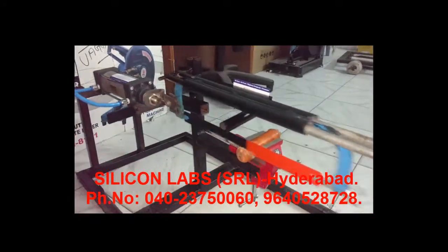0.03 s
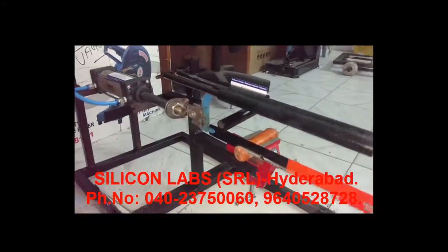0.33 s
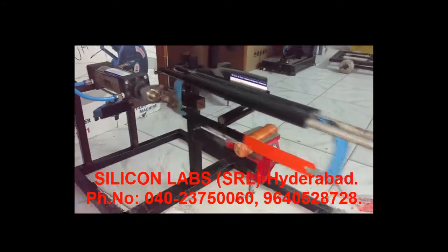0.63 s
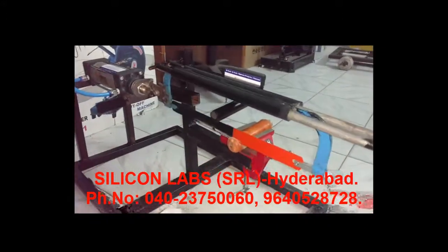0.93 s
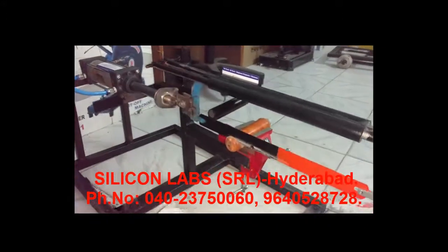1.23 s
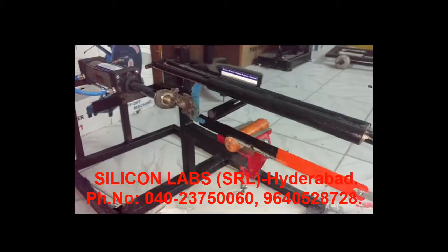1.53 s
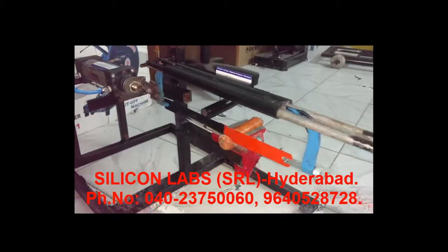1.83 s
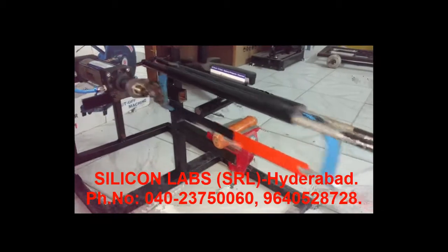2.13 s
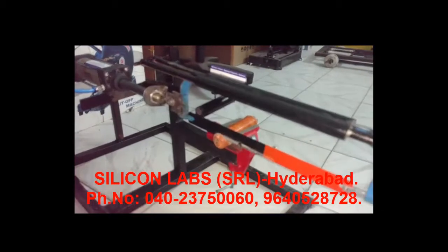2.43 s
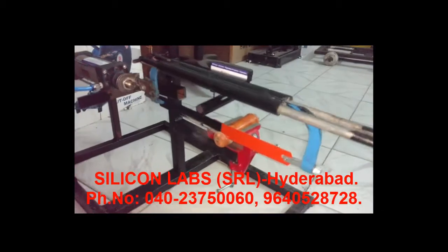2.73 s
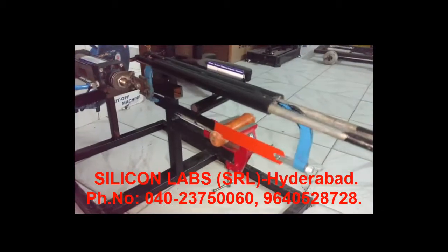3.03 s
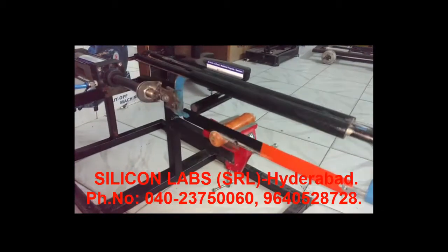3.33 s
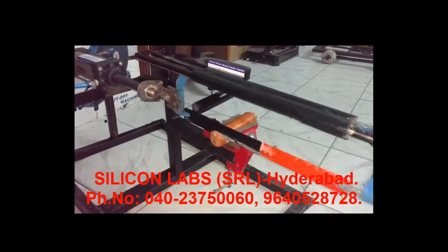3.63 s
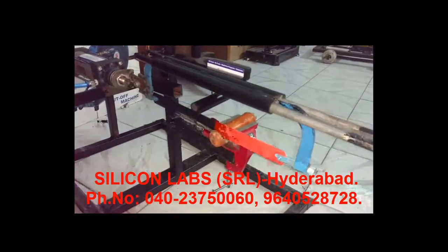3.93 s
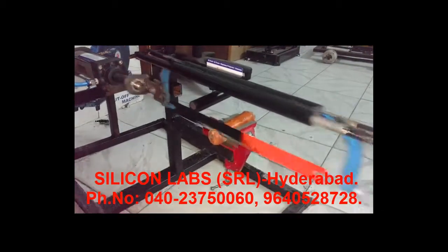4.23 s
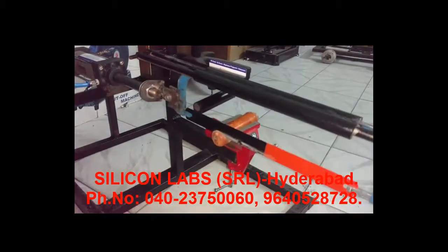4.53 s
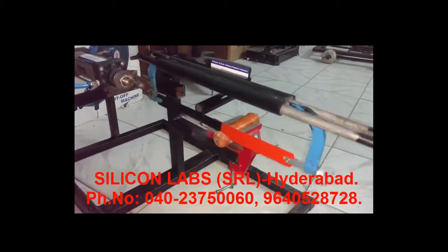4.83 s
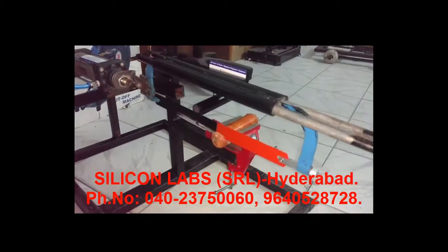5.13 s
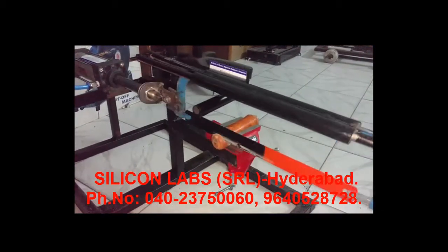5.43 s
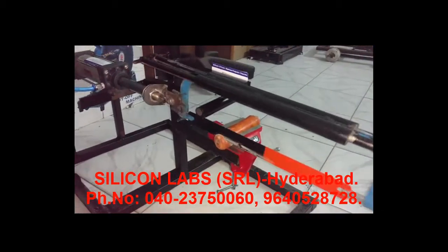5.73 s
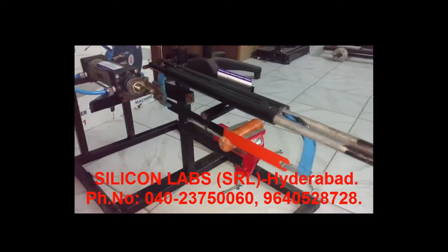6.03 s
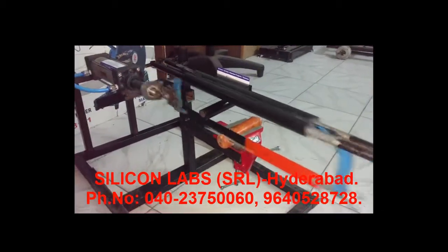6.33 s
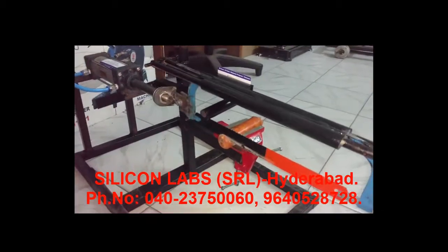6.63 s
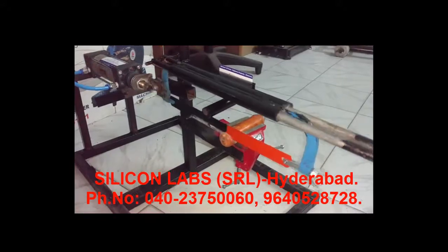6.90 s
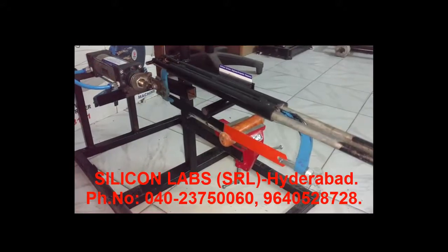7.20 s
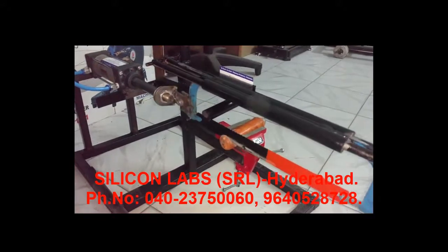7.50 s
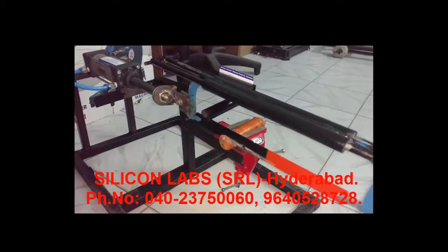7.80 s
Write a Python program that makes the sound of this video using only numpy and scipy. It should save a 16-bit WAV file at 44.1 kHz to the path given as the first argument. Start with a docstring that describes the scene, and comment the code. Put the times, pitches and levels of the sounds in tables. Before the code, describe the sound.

Sharp bursts of exhaust air and short metallic rattles alternate steadily as a pneumatic machine cycles in an echoing workshop.

```python
"""A sharp hiss of air, then a steel clatter: an air cylinder drives a slide out and back once a second.
At each reversal the valve thumps and dumps a chamber of air through its exhaust port. Just under a fifth
of a second later the slide rattles into its stop and rings the tube frame. On the way back the rod ticks
and the slide sometimes squeaks. The tiled workshop echoes and murmurs, and a seal leaks a little air
while the slide is out."""
import sys
import numpy as np
from scipy import signal
from scipy.fft import rfft, irfft, next_fast_len
from scipy.io import wavfile
from scipy.ndimage import map_coordinates

SR = 44100
rng = np.random.default_rng(int(sys.argv[2]) if len(sys.argv) > 2 else 0)


def inscribe(sig):
    """Save sig as 16-bit PCM at rate SR to the path in sys.argv[1].

    A 1-D sig is mono; a 2-D sig holds one channel per row.
    Samples are clipped to [-1, 1] before scaling.
    """
    pcm = np.round(np.clip(np.atleast_2d(sig).T, -1, 1) * 32767)
    wavfile.write(sys.argv[1], SR, pcm.astype(np.int16))


N = 355446
TIME = np.arange(N) / SR

# Strokes of the slide: (valve opens [s], hiss level [dB], treble offset [dB], knock level [dB],
# first rebound level [dB], time for the rattle to fade by 60 dB [s])
OUT_STROKES = [(0.0283, -8, -11, -21.5, -31, 0.27), (1.0664, -6.5, -12.5, -13.5, -27, 0.14),
               (2.1057, -7, -12, -18.5, -24.5, 0.3), (3.1423, -9, -10, -26, -25, 0.21),
               (4.1788, -9, -10, -22.5, -18, 0.14), (5.217, -10, -11, -19, -19.5, 0.13),
               (6.2555, -8, -13, -19, -21, .18), (7.2924, -7, -13, -22.5, -17, 0.31)]
BACK_STROKES = [(0.5249, -10, -12, -23, -35, 0.14), (1.5635, -10.5, -12.5, -25, -49, 0.15),
                (2.5987, -10, -13, -28, -28, 0.12), (3.6374, -11, -14.5, -33, -37.5, 0.25),
                (4.6748, -11, -12, -21.5, -28.5, 0.23), (5.7117, -12, -13, -24.5, -28.5, 0.22),
                (6.752, -10.5, -14.5, -22.5, -25, 0.19), (7.7865, -10.5, -14, -26, -28.5, 0.25)]
# Squeaks of the returning slide: (time [s], level [dB], pitch [Hz])
SQUEAKS = [(.735, -35, 6100), (.86, -37.5, 5900), (4.895, -28, 6500), (4.995, -38.5, 5930),
           (5.932, -28, 6630), (6.977, -24.5, 6450)]

# Tone colour of each noise: (frequency [Hz], level [dB])
WORKSHOP_SPECTRUM = [(25, -12), (70, -10.5), (160, 4), (400, 2), (650, 2), (900, -4), (2000, -12),
                     (3500, -4), (6400, -3), (8000, -6), (16000, -9.5)]
LEAK_SPECTRUM = [(1000, -27), (3000, -5), (6500, 6), (10000, -1), (14500, 4), (16000, -3.5)]
CLATTER_SPECTRUM = [(100, -26), (400, -4), (550, -14.5), (720, -3), (900, -6.5), (1250, -2.5), (1500, 0),
                    (1700, 0.5), (2200, -1.5), (3200, -3), (4500, -8.5), (10000, -36)]  # loose steel parts
CONTACT_SPECTRUM = [(800, -10.5), (2500, 2), (4500, 3), (7000, 1), (10000, -3), (16000, -49)]  # steel touching steel
PUFF_SPECTRUM = [(25, -8), (70, -6), (150, 5), (260, -22), (450, 5.5), (800, -2), (1600, -26),
                 (4000, -22.5)]  # the first air out of the valve
JET_SPECTRUM = [(30, -17.5), (150, -16), (600, -12), (1050, -12.5), (2000, -8.5), (2800, -5.5),
                (3400, -3.5), (4300, -2.5), (5200, 1), (6000, -1), (7000, 0), (8500, -4), (11000, -9.5),
                (16000, -19)]  # the main hiss
FIZZ_SPECTRUM = [(4000, -20), (8000, -5), (11500, -1), (13500, -2.5), (16000, -8)]  # the treble on top of the hiss

# Resonances of the tube frame and the two exhaust ports: (frequency [Hz], width [Hz], level [dB])
FRAME_MODES = [(649, 21.5, -1), (674, 6.5, 6), (730.6, 11.4, 5), (1118, 26, -0.5), (1219, 24, -0.5),
               (1321, 15, -0.5), (1395, 26, -3), (1429, 16, 4.5), (1511, 21.5, 1.5), (1867, 10.6, 9.5),
               (1996, 55, 6.5), (2280, 160, -21), (2575, 33, 9), (2990, 20, 0.5), (3165, 91, -3.5),
               (3375, 17, 4.5)]
OUT_PORT_MODES = [(3400, 440, -10), (3625, 180, -2), (6275, 270, 2), (6630, 240, -3), (11500, 490, -18),
                  (13900, 400, -18)]
BACK_PORT_MODES = [(3490, 99, -3), (4200, 260, -9), (5440, 170, -6), (6060, 380, 3), (6340, 300, 0),
                   (8800, 330, -32)]

# Echo of the workshop: (frequency [Hz], time to fade by 60 dB [s])
ROOM_DECAY = [(150, 0.51), (1000, 0.68), (4000, 0.55), (8000, 0.41), (15000, 0.34)]
# How alike left and right can be: (frequency [Hz], likeness [1 = fully, 0 or less = unrelated])
STEREO_LIKENESS = [(80, 0.15), (350, 0.25), (1200, 0.46), (2300, .5), (3400, 0.83), (4700, 0.5),
                   (6300, 0.62), (8000, 0.23), (16000, -0.74)]
# Which side is louder: (frequency [Hz], left minus right [dB])
STEREO_BALANCE = [(80, -2.5), (350, 1.5), (1000, -1), (3500, -1), (4500, -2.5), (6700, -4.5), (9300, -2),
                  (16000, -3.5)]


def amp(db):
    """Turn decibels into a gain."""
    return 10 ** (np.asarray(db) / 20)


def unit_rms(x):
    """Scale a signal to an average power of 1."""
    return x / np.sqrt(np.mean(x ** 2) + 1e-20)


def curve_at(points, hz):
    """Read between (frequency, value) points on a log frequency axis."""
    freqs, values = np.transpose(points)
    return np.interp(np.log(hz + 1), np.log(freqs + 1), values)


def filtered(x, response):
    """Give each frequency in x the gain and phase that response(hz) asks for."""
    size = next_fast_len(N + SR // 2)
    return irfft(rfft(x, size) * response(np.fft.rfftfreq(size, 1 / SR)), size)[..., :N]


def noise(spectrum):
    """Two unrelated noises with the same tone colour."""
    size = next_fast_len(N)
    gain = amp(curve_at(spectrum, np.fft.rfftfreq(size, 1 / SR)))
    white = rng.standard_normal((2, size))
    return unit_rms(irfft(rfft(white) * gain, size)[:, :N])


def wobble(rate):
    """A smooth curve through `rate` random values a second."""
    return map_coordinates(rng.standard_normal(int(N * rate / SR) + 4), [TIME * rate / SR])


def add(track, start_s, sound):
    """Mix a sound into a track at the given time."""
    part = track[..., max(0, round(start_s * SR)):][..., :sound.shape[-1]]
    part += sound[..., :part.shape[-1]]


def ringing(x, modes):
    """Let x ring a set of resonances, added with alternating signs."""
    return filtered(x, lambda f: sum((-1) ** k * amp(db) * 1j * width * f / (hz**2 - f**2 + 1j * width * f)
                                     for k, (hz, width, db) in enumerate(modes)))


def stereo(x, likeness_power):
    """Spread a shared row and a difference row to left and right; a higher power makes them less alike."""
    in_step_hz, band_hz, plain_lag_hz = 1046, 1250, 9700

    def response(hz):
        # The sides move together in the bass; above that their relative sign flips once a band.
        angle = np.pi * np.maximum(hz - in_step_hz, 0) / band_hz
        # In the treble the flips smooth into a plain lag of the left side.
        swing = np.cos(angle) - 1j * np.minimum(hz / plain_lag_hz, 1) * np.sin(angle)
        likeness = np.clip(curve_at(STEREO_LIKENESS, hz) * abs(swing), 0, 1) ** likeness_power
        spread = np.arccos(likeness) / 2
        lean = amp(curve_at(STEREO_BALANCE, hz) / 2) * np.exp(1j * np.unwrap(np.angle(swing)) / 2)
        shared, apart = np.cos(spread), np.sin(spread)
        return np.array([[shared * lean, apart * lean], [shared / lean, -apart / lean]])

    return filtered(x, response).sum(axis=1)


def workshop_and_leak(shop_db, leak_db):
    """Workshop noise, and a seal that leaks while the slide is out."""
    slide_is_out = np.zeros(N)
    for outward, back in zip(OUT_STROKES, BACK_STROKES):
        slide_is_out += (TIME > outward[0]) & (TIME < back[0])
    murmur = amp(shop_db + 0.3 * wobble(3)) * noise(WORKSHOP_SPECTRUM)
    return murmur + amp(leak_db) * slide_is_out * noise(LEAK_SPECTRUM)


def room(x, echo_db):
    """Hard walls and tiles add an echo that dies sooner in the treble and changes with each stroke."""
    starts = sorted(max(0, round((s - .02) * SR)) for s, *_ in [*OUT_STROKES, *BACK_STROKES])
    hz, t, bands = signal.stft(rng.standard_normal((len(starts), 2, SR // 2)), SR, nperseg=256)
    fade = amp(-60 * t / curve_at(ROOM_DECAY, hz)[:, None])
    tails = signal.istft(bands * fade, SR, nperseg=256)[1]
    tails *= 1 - np.exp(-TIME[:tails.shape[-1]] / 0.0097)  # the echo takes a moment to build
    echo = np.zeros((2, N))
    for start, end, tail in zip(starts, starts[1:] + [N], tails):
        add(echo, start / SR, signal.fftconvolve(x[:, start:end], tail / np.linalg.norm(tail[0]), axes=1))
    return x + amp(echo_db) * echo


def ticks(strokes, first_s, last_s, level_db, scatter_db, fade_s, count):
    """A few sharp ticks at random moments, first_s to last_s after the valve opens."""
    t = TIME[:SR // 20]
    envelope = np.zeros(N)
    for open_s, *_ in strokes:
        for moment, size in zip(rng.random(count), rng.standard_normal(count)):
            tick_s = open_s + first_s + moment * (last_s - first_s)
            add(envelope, tick_s, amp(level_db + scatter_db * size - 60 * t / fade_s))
    return envelope * noise(JET_SPECTRUM)


def guide_squeaks(level_db, grit_db, swell_s, width_hz):
    """The slide rubs its dry steel guide: a short rough squeak over gritty noise."""
    t = TIME[:SR // 8]
    middle_s = t.mean()
    swell = np.exp(-((t - middle_s) / swell_s) ** 2)
    squeak, grit = np.zeros((2, N)), np.zeros(N)
    for peak_s, db, hz in SQUEAKS:
        band = signal.butter(2, [hz - width_hz / 2, hz + width_hz / 2], "band", fs=SR)
        tone = unit_rms(signal.lfilter(*band, rng.standard_normal((2, len(t)))))
        add(squeak, peak_s - middle_s, amp(db) * swell * tone)
        add(grit, peak_s - middle_s, amp(db + grit_db) * swell)
    return amp(level_db + wobble(260)) * (squeak + grit * noise(CONTACT_SPECTRUM))


def knocks(strokes, travel_s, rebounds=3, loss_db=12, knock_bright_db=-7.5, rebound_bright_db=2.5):
    """The slide grazes its stop, hits it and bounces ever more weakly."""
    rows = []  # (time [s], level [dB], brightness [dB], rattle fade time [s])
    for open_s, _, _, knock_db, rebound_db, settle_s in strokes:
        hit_s = open_s + travel_s
        rows.append((hit_s - .025, knock_db - 9, knock_bright_db, settle_s))  # a light touch comes first
        rows.append((hit_s, knock_db, knock_bright_db, settle_s))
        flights_s = .04 + .007 * rng.standard_normal(rebounds)
        for k, delay_s in enumerate(np.cumsum(flights_s)):
            rows.append((hit_s + delay_s, rebound_db - k * loss_db, rebound_bright_db, settle_s))
    return rows


def slide_hits(blow_db, clatter_db, contact_db, contact_fade_s):
    """Each knock is a blow and a rattle of loose steel, which both ring the frame, plus a bright clash."""
    t = TIME[:SR // 3]
    blows = np.zeros((2, N))
    rattle_power, contact_power = np.zeros((2, N))
    hits = knocks(OUT_STROKES, travel_s=.146) + knocks(BACK_STROKES, travel_s=.184)
    for hit_s, db, bright_db, settle_s in hits:
        add(blows[0], hit_s, amp([db + blow_db]))  # row 0 is shared by left and right
        add(rattle_power, hit_s - .002, amp(db - 60 * t / settle_s) ** 2 * (1 - np.exp(-t / 0.01)))
        add(contact_power, hit_s, amp(db + bright_db - 60 * t / contact_fade_s) ** 2)
    roughness = amp(3.26 * wobble(220))
    rattle = np.sqrt(rattle_power) * roughness * noise(CLATTER_SPECTRUM)
    contact = np.sqrt(contact_power) * roughness * noise(CONTACT_SPECTRUM)
    frame = ringing(blows + rattle, FRAME_MODES)
    return frame + amp(clatter_db) * rattle + amp(contact_db) * contact


def valve_thumps(out_db, back_db, hz, swell_s, puff_db, puff_fade_s):
    """The spool (the valve's moving part) shifts with a hollow thump; the first air leaves as a puff."""
    t = TIME[:SR // 4]
    swell = (t / swell_s * np.exp(1 - t / swell_s)) ** 5.5
    puff_shape = (1 - np.exp(-t / 0.00044)) * amp(puff_db - 60 * t / puff_fade_s)
    thump, puff = np.zeros((2, N)), np.zeros(N)
    for strokes, db in ((OUT_STROKES, out_db), (BACK_STROKES, back_db)):
        for open_s, *_ in strokes:
            detune, phase = rng.standard_normal(2)
            tone = np.sin(2 * np.pi * (hz * (1 + .04 * detune) * t + phase))
            add(thump[0], open_s, amp(db) * swell * tone)
            add(puff, open_s - .003, puff_shape)
    return thump + puff * noise(PUFF_SPECTRUM)


def exhaust(strokes, port_modes, rise_s, empty_s, fall_db_per_s, surge_db, surge_s,
            hiss_db, fizz_db, whistle_db):
    """Air rushes out as chamber pressure falls steadily, then collapses; the treble fades first."""
    t = TIME[:SR // 2]
    flow = amp(-fall_db_per_s * t) / np.sqrt(1 + (t / empty_s) ** 9.1)
    hiss, fizz, whistle, opening = np.zeros((4, N))
    for open_s, db, treble_db, *_ in strokes:
        onset = amp(db) * (1 - np.exp(-t / rise_s))
        add(hiss, open_s - .008, amp(db - 20.5 - 60 * t / 0.048))  # a wisp as the spool starts to move
        add(hiss, open_s, onset * flow)
        add(fizz, open_s, onset * amp(treble_db) * flow ** 2)
        add(whistle, open_s, onset * flow ** 1.97)
        add(opening, open_s, 1 / (1 + (t / surge_s) ** 6))
    # The jet surges and sputters while the valve is opening.
    sputter = 1 + .55 * wobble(330)
    turbulence = amp(surge_db * opening * sputter + 0.26 * wobble(110) + 0.16 * wobble(14))
    port_tone = unit_rms(ringing(rng.standard_normal((2, N)), port_modes))
    jet = amp(hiss_db) * hiss * noise(JET_SPECTRUM) + amp(fizz_db) * fizz * noise(FIZZ_SPECTRUM)
    return turbulence * (jet + amp(whistle_db) * whistle * port_tone)


def scene():
    """Going out, the valve snaps open and spits; coming back, it opens more softly and thumps harder."""
    outward = exhaust(OUT_STROKES, OUT_PORT_MODES, rise_s=0.0016, empty_s=.18, fall_db_per_s=31,
                      surge_db=1.5, surge_s=0.031, hiss_db=-12, fizz_db=-5, whistle_db=-17)
    back = exhaust(BACK_STROKES, BACK_PORT_MODES, rise_s=0.0055, empty_s=.2, fall_db_per_s=39.5,
                   surge_db=1, surge_s=0.046, hiss_db=-8, fizz_db=-1.5, whistle_db=-14)
    spits = ticks(OUT_STROKES, first_s=.004, last_s=.036, level_db=-20.5, scatter_db=4,
                  fade_s=0.0052, count=3)
    rod_settling = ticks(BACK_STROKES, first_s=0.19, last_s=.42, level_db=-44.5, scatter_db=1,
                         fade_s=0.028, count=3)
    thumps = valve_thumps(out_db=-35, back_db=-29.5, hz=351, swell_s=0.01, puff_db=-39.5, puff_fade_s=0.17)
    steel = slide_hits(blow_db=32, clatter_db=-8.5, contact_db=-5, contact_fade_s=0.17)
    squeaks = guide_squeaks(level_db=-2, grit_db=2.5, swell_s=0.0063, width_hz=470)
    wide = room(outward + back + spits + rod_settling + thumps + squeaks, echo_db=-6)
    wide += workshop_and_leak(shop_db=-47.5, leak_db=-50)
    focused = room(steel, echo_db=-5.5)
    return stereo(wide, likeness_power=1) + stereo(focused, likeness_power=0.18)


def record(dry):
    """Cut away the very highest treble."""
    top_hz = 15650
    return filtered(dry, lambda hz: 1 / (1 + (hz / top_hz) ** 200))


dry = scene()
out = record(dry)
inscribe(out)
```